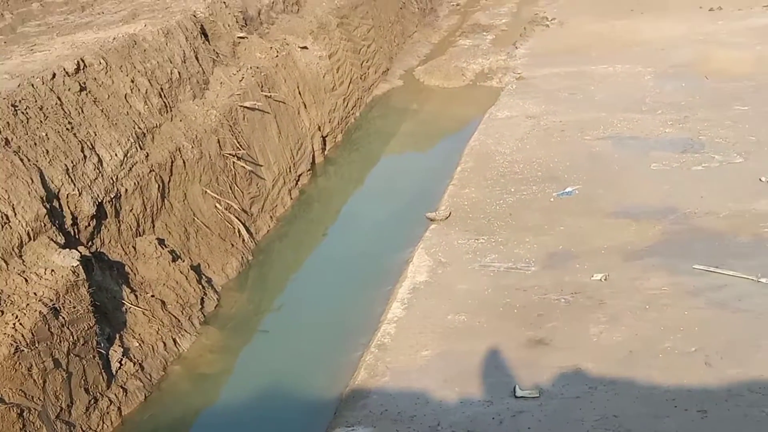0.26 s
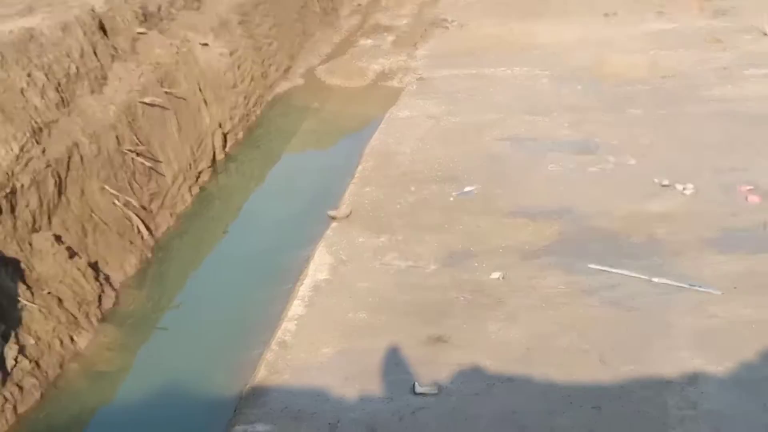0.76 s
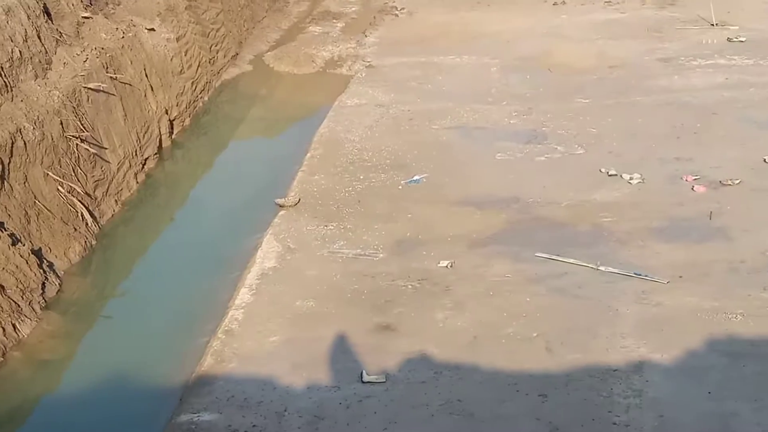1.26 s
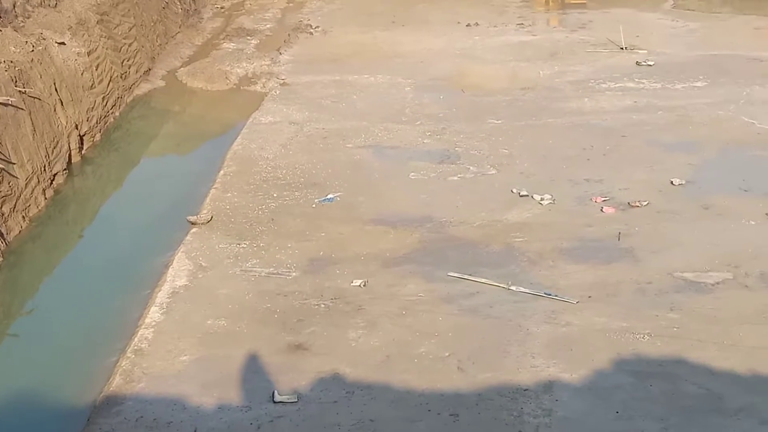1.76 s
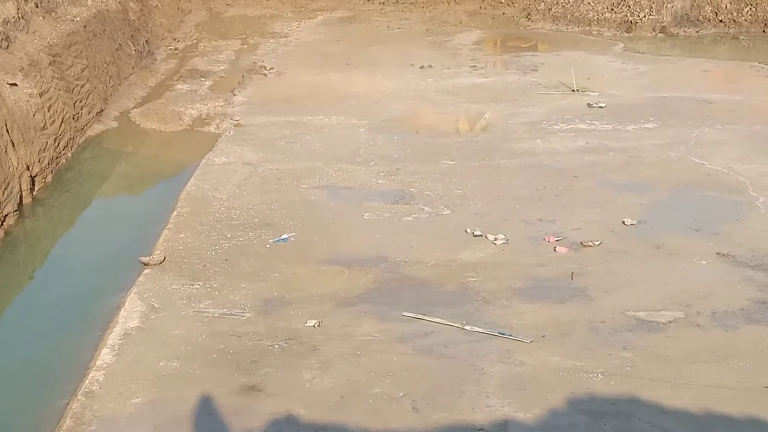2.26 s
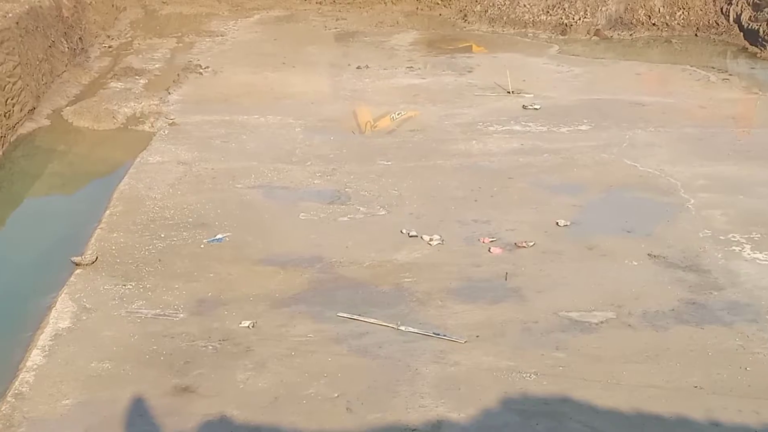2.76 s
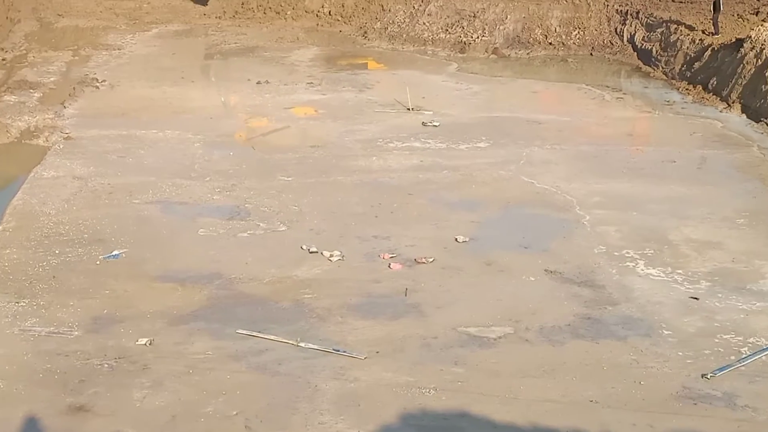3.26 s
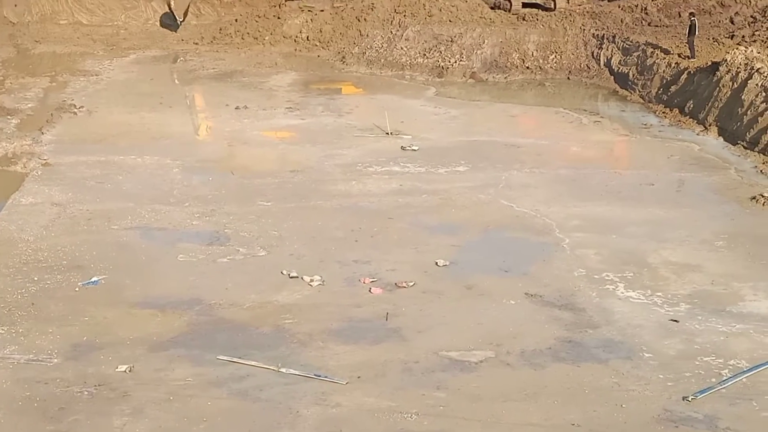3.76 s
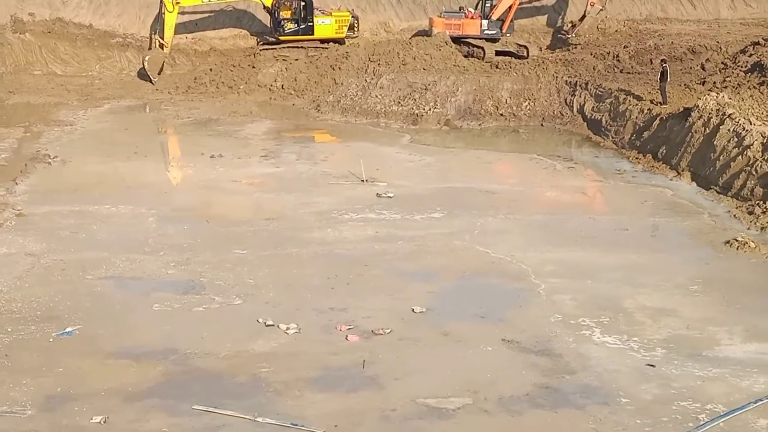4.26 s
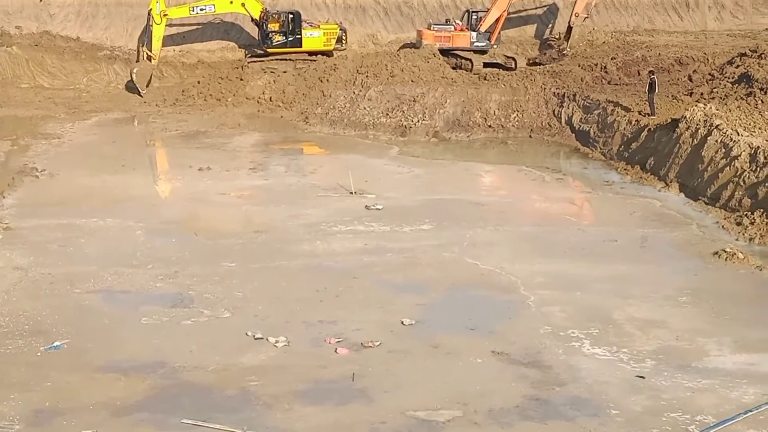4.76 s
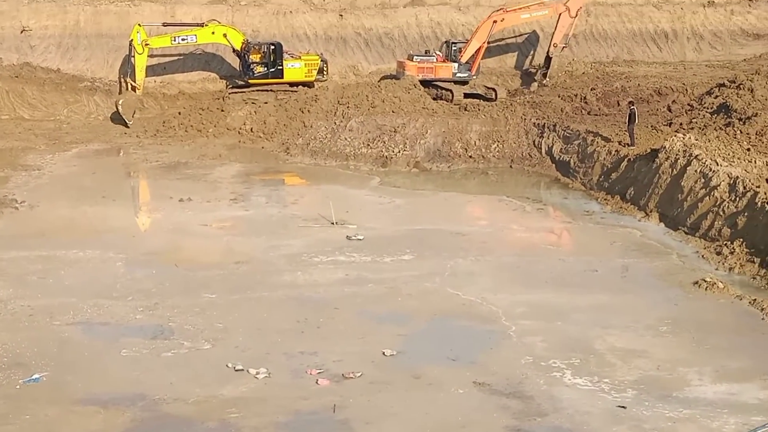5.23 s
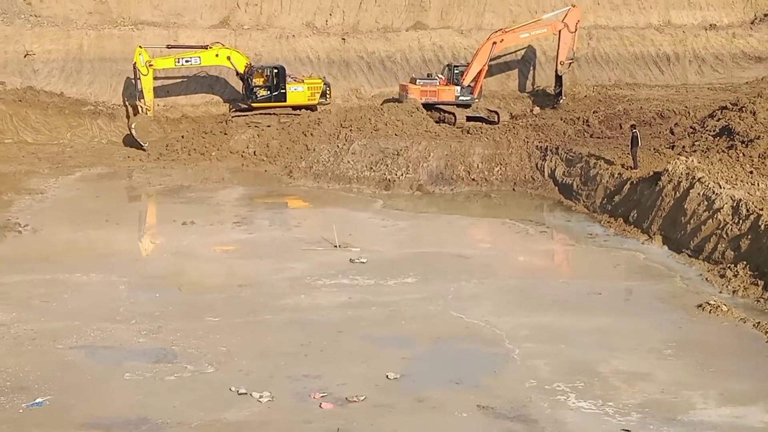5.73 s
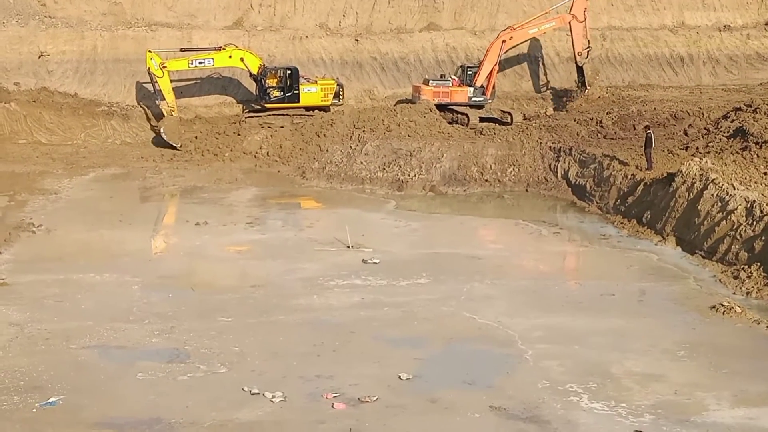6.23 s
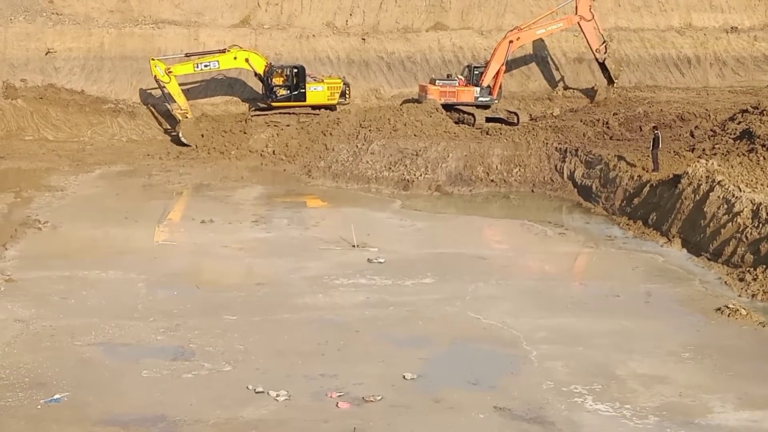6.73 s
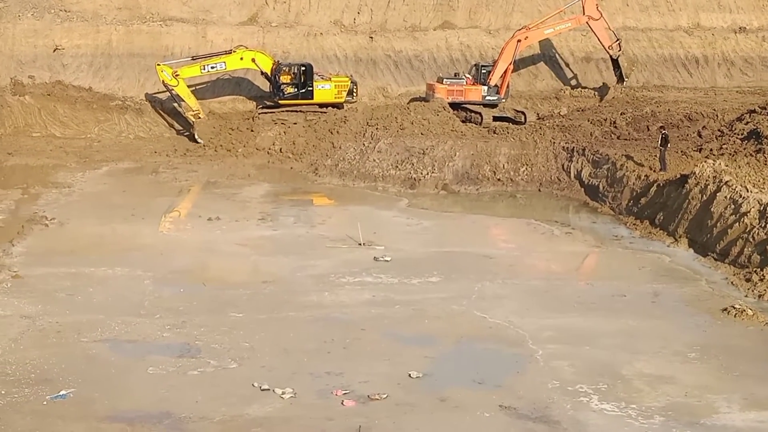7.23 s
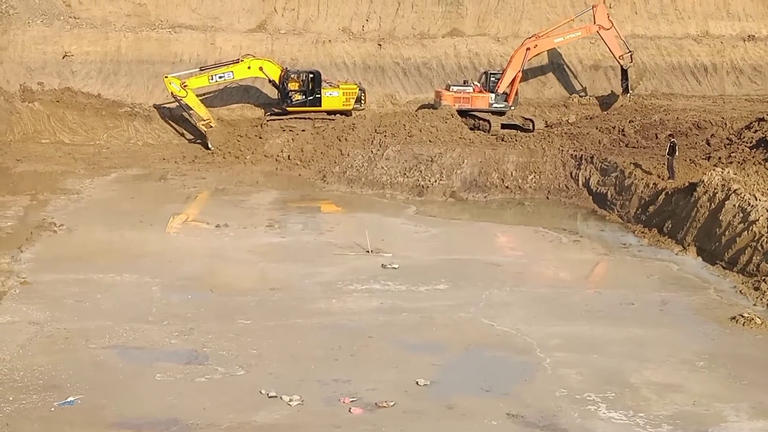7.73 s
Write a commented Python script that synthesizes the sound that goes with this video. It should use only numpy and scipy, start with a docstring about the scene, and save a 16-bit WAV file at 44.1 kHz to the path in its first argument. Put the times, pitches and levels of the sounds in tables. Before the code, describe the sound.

Heard from the rim of an open earth pit, two diesel excavators drone on the far side, their low firing tones beating over noisy clatter and faint thin whines. After two seconds, soil and stones start crunching, strongest between four and a half and just past six seconds, with pebble clicks and short bucket clanks. Light wind bumps the phone microphone.

```python
"""Two diesel excavators work on the far side of an open earth pit, heard from the rim as the phone pans to them.
One runs steadily while the other speeds up and sags: their firing tones beat over a noisy clatter and thin whines.
Soil and stones crunch in short showers of noise grains that the pit walls smear; brief tones are struck stones,
and harder blows ring a steel bucket as fading tones. A light breeze, made of low noise, puffs on the microphone."""
import sys
import numpy as np
from scipy import signal
from scipy.fft import rfft, irfft
from scipy.io import wavfile
from scipy.ndimage import uniform_filter1d

SR = 44100
rng = np.random.default_rng(int(sys.argv[2]) if len(sys.argv) > 2 else 0)


def dump_mix(stems):
    """Bounce the given channels to the path in sys.argv[1] as a 16-bit WAV at rate SR."""
    frames = np.atleast_2d(stems).T  # one column per channel
    limited = np.clip(frames, -1, 1)  # hard clip at full scale
    pcm = np.round(limited * 32767).astype(np.int16)
    wavfile.write(sys.argv[1], SR, pcm)


N = 352359
TIME = np.arange(N) / SR
FREQ = np.maximum(np.fft.rfftfreq(N, 1 / SR), 1)

# The steady excavator's engine: t/s, firing rate f/Hz, base exhaust level/dB
STEADY_ENGINE = [(0.0, 70.9, -53.5), (0.7, 71.16, -40.5), (1.35, 70.66, -50.5), (2.05, 71.9, -52.5),
                 (2.5, 70.02, -55), (4.0, 74.36, -50.5), (5.1, 73.88, -63.5), (5.6, 73.04, -56.5),
                 (7.99, 71.28, -52)]
# The engine that speeds up and sags with the load: t/s, firing rate f/Hz, base exhaust level/dB
WORKING_ENGINE = [(0.0, 67.3, -63), (0.35, 73.15, -58), (1.2, 72.36, -51), (1.9, 72.76, -48),
                  (2.25, 74.73, -54), (2.45, 76.24, -47.5), (2.95, 72.82, -50.5), (3.3, 78.67, -54),
                  (3.8, 74.44, -60), (4.3, 81.87, -57), (4.65, 72.28, -63), (4.88, 75.25, -53),
                  (5.0, 76.96, -56), (5.15, 76.12, -66), (5.28, 74.8, -58), (5.5, 73.18, -53),
                  (6.2, 72.33, -54.5), (7.99, 71.5, -51.5)]
# Exhaust overtones: multiple of the firing rate, base level/dB
OVERTONES = [(2, -62.5), (3, -67.5), (6, -64), (7, -66), (9, -66.5), (12, -68)]
# A pipe tone that shifts under load: t/s, f/Hz, base level/dB
PIPE_TONE = [(0, 250, -54), (.5, 214.3, -64), (1.4, 214.5, -48), (1.9, 213, -56.5), (2.3, 230, -62),
             (2.88, 242, -55), (3.2, 250, -72), (3.35, 257, -46), (3.55, 259, -54), (3.8, 250, -51.5),
             (4.1, 249, -52.5), (4.45, 253, -59), (4.75, 284, -43.5), (4.92, 248, -48), (5.08, 245.4, -42),
             (5.25, 252, -63.5), (5.8, 247, -66), (6.7, 250, -73), (7.99, 206.6, -48.5)]
# Machinery din: t/s, base level/dB, bass boost/dB, hiss boost/dB
DIN = [(0, -41.5, -3.5, 3.5), (.7, -42.5, -1, 3), (1.7, -42.5, -1.5, 4.5), (2.05, -43.5, -4, 1),
       (2.5, -44, 0, 2.5), (3, -42, -0.5, 7), (4, -41.5, 1.5, 5.5), (4.5, -39, -1, 5.5),
       (5.1, -38.5, 1, 6.5), (5.5, -37, -1, 3), (6.4, -41.5, 1, 6), (7.99, -41, 2, 5)]
# Colour of the din with the phone turned away: f/Hz, relative level/dB
DIN_AWAY = [(70, -6.5), (110, -2), (210, 11), (360, 0), (460, -0.5), (560, -8), (700, 3.5), (850, 1.5),
            (1020, -6), (1280, 2), (1750, -7.5), (2400, 2), (3600, -11), (4800, -19.5), (6100, -17.5),
            (7000, -43.5), (8400, -71.5)]
# Colour of the din with the phone facing the machines: f/Hz, relative level/dB
DIN_FACING = [(70, -23), (110, -3.5), (155, 0), (195, -6.5), (260, 0), (370, -4), (460, -2), (560, -5.5),
              (700, 2.5), (850, 3), (1020, -6), (1300, -2.5), (1750, -6.5), (2200, 5), (2700, -8.5),
              (3300, -22), (4800, -32.5), (6100, -35), (7000, -37.5), (8400, -70)]
# Engine panels that buzz in the din, each swelling on its own: f/Hz, width/Hz, swell/dB
PANELS = [(633, 51, 3), (730, 83, 2.5), (815, 90, 4.5), (1360, 120, 2), (2110, 270, 2.5), (2350, 170, 4)]
# How far the phone faces the machines: t/s, share/0-1
FACING = [(0, 0.35), (1.6, 0.42), (2.4, 0.47), (3.2, 0.86), (7.99, 0.75)]
# Likeness of the two microphone ports: f/Hz, coherence/0-1
LIKENESS = [(60, 0.98), (250, 0.99), (500, 0.91), (1000, 0.85), (2000, 0.29), (4000, 0.015), (8000, 0)]
# Colour of the ports: f/Hz, left minus right turned away/dB, left minus right facing/dB
PORTS = [(60, -1, -1.5), (300, -0.5, 1), (570, -3.5, -5), (895, -3, 1), (1330, -5, -4), (1960, -8.5, 6.5),
         (2850, 5.5, 12.5), (3000, 9, 0), (5100, -13, -4.5), (6150, -13.5, 3), (8000, 0.5, 0.5)]
# Gusts on the microphone ports: t of the peak/s, base level/dB, swell and fade time/s
GUSTS = [(.68, -43.5, 0.13), (1.9, -57, 0.28), (5.15, -53, .2), (6.08, -32.5, 0.031), (6.3, -40.5, 0.098)]
# Single puffs of wind: t/s, starting level in the right port/dB, f/Hz
PUFFS = [(0.647, -26, 164), (0.77, -34, 118), (6.021, -26.5, 134), (6.074, -36, 125), (6.312, -26.5, 140)]
# Short whines of the machinery: t/s, length/s, starting f/Hz, base level/dB
WHINES = [(0.038, 0.28, 2355, -50.5), (.5, 0.38, 2115, -52), (0.18, .42, 2100, -58), (0.6, 0.69, 2755, -55),
          (.78, 0.36, 2200, -53), (1.07, .2, 2580, -56), (1.7, 0.52, 2100, -50.5), (1.33, .45, 3008, -58.5)]
# Slips of soil and stones: t/s, base crunch level/dB, then thud, knock and grit over it/dB,
# attack/s, hold/s
CRUNCHES = [(2.105, -37.5, 0.5, 1, -12.5, .004, 0.041), (2.18, -38.5, -6.5, -2.5, -17, 0.0058, 0.043),
            (2.239, -38.5, -11, -5.5, -13.5, 0.0054, 0.019), (2.544, -31, -8, -6, -11.5, 0.005, .014),
            (2.835, -48, 6.5, -8, -8, 0.0051, 0.028), (3.621, -42.5, -0.5, 3, -13.5, .004, .035),
            (4.049, -31, -7.5, -14, -15.5, 0.0067, 0.014), (4.083, -29.5, -12.5, -0.5, -5.5, 0.0044, 0.026),
            (4.579, -25, -5, -3, -9, .004, 0.061), (4.764, -32.5, -11, -7.5, -19, 0.014, 0.053),
            (4.828, -24.5, -13.5, -10, -12, 0.006, 0.034), (4.869, -27, -9.5, -7, -14.5, .006, 0.038),
            (5.076, -32, -16, -16, -17, 0.014, .0082), (5.239, -26.5, -6, -9.5, -13, 0.012, 0.083),
            (5.423, -34, -8, -13, -16.5, 0.0089, 0.0086), (5.525, -37.5, -7, -13, -14, 0.0044, .015),
            (5.544, -36.5, 0, -0.5, -15, 0.01, 0.023), (5.83, -26, -5, -12.5, -11.5, 0.005, 0.012),
            (5.86, -26, -10.5, -6, -14, 0.006, 0.08), (5.953, -29, -19, -8, -11, 0.014, 0.046),
            (6.129, -22, -5, -5, -11.5, 0.019, 0.057), (7.009, -39, -13, 4, -17, 0.014, 0.014),
            (7.158, -41, -8, 2, -19, 0.0036, 0.023), (7.33, -34, -4, -4, -11.5, 0.0068, 0.043),
            (7.361, -36.5, 4, 2, -13.5, 0.0085, 0.056), (7.59, -47, -16, 5.5, -18, 0.0089, 0.093),
            (7.728, -37, -2.5, -6, -14, 0.0069, 0.022), (7.762, -32, -5, -5.5, -10, 0.006, 0.028)]
# Broad colour of the soil: f/Hz, relative level/dB
CRUNCH_COLOUR = [(80, -19.5), (140, -7), (270, 7.5), (390, -8.5), (490, 5.5), (570, -3), (735, 4),
                 (1050, 0.5), (1350, 5.5), (1750, 3.5), (2220, 9), (3200, -4), (4500, -17), (6200, -26),
                 (8400, -47.5), (11000, -65.5), (14900, -74)]
# Short resonances that every crunch rings: f/Hz, width/Hz, boost/dB
RINGS = [(750, 310, 4.5), (1357, 160, 1.5), (2150, 200, 1.5), (2580, 250, 2), (3500, 140, 4.5),
         (5800, 240, -0.5)]
# Dry clicks of lone pebbles: t/s, body base level/dB, bright edge base level/dB
CLICKS = [(2.117, -38, -39), (2.15, -37, -42), (2.26, -36.5, -45), (2.56, -31, -32.5), (2.847, -38, -50),
          (3.46, -36, -51), (3.628, -42, -47), (4.128, -30.5, -42), (4.895, -29.5, -49), (5.027, -36, -46),
          (5.095, -40.5, -54), (5.19, -32, -50), (5.441, -39, -50), (5.524, -35, -49), (5.593, -35, -51),
          (5.935, -35, -50), (5.972, -32, -44), (7.185, -40, -58), (7.334, -28, -43.5), (7.421, -49, -47),
          (7.594, -35, -50), (7.839, -31.5, -46)]
# Hard strikes of steel on stone: t/s, base level/dB, f/Hz, second, quieter partial f/Hz, ring time/s
STRIKES = [(2.165, -38, 2215, 2140, .035), (2.204, -34, 2240, 2193, 0.032), (2.257, -38, 2180, 2160, 0.015),
           (2.553, -32, 715, 787, 0.067), (4.062, -28, 2040, 2360, 0.011),
           (4.091, -17.5, 2090, 2624, 0.0047), (4.588, -19, 2164, 2593, 0.007),
           (4.596, -21, 1925, 2310, 0.0073), (4.834, -27, 1770, 3630, 0.0069),
           (4.834, -35, 6200, 6350, 0.004), (4.847, -29, 1300, 2020, .006), (4.914, -26, 2260, 2640, .009),
           (5.318, -33, 739, 2270, .012), (5.523, -24, 2070, 865, 0.0072), (5.84, -25, 1766, 2170, 0.0049),
           (5.84, -31.5, 4500, 3500, 0.0081), (5.841, -34.5, 3290, 3260, 0.055),
           (6.146, -29, 2160, 2700, 0.0092), (6.17, -38, 3900, 4700, 0.01),
           (7.334, -28, 2290, 1390, 0.0038), (7.355, -27, 1390, 2265, 0.021),
           (7.378, -54.5, 5730, 5800, 0.066), (7.392, -33.5, 795, 713, 0.045),
           (7.772, -31.5, 2110, 2270, 0.032)]
# Blows that ring a steel bucket: t/s, base level/dB, tilt/dB per octave, ring length/multiple of the modes' own
CLANGS = [(2.552, -35, 1.5, .75), (4.085, -34, -4.5, 1), (4.592, -35.5, 1, 1), (4.624, -35.5, -5, 1),
          (4.882, -40.5, 0, .8), (5.253, -38.5, -2, .8), (5.871, -40, -5, 1), (6.187, -29, -7.5, .8),
          (7.378, -34.5, -3, 1), (7.408, -40, -6.5, 1.3), (7.625, -40.5, -6, 1), (7.775, -34.5, -3, .8)]
# Modes of the bucket: f/Hz, relative level/dB, ring time/s
BUCKET_MODES = [(694, -2, 0.051), (726, -7.5, 0.049), (797, -6, 0.085), (932, -10, 0.06), (1350, -15, 0.04),
                (2150, -13.5, 0.04), (2950, -5, 0.05), (2930, -3.5, 0.018), (3200, -10, 0.017),
                (3470, -6, 0.02), (3760, -9.5, 0.036), (5000, -18, 0.015)]

# overtones follow this share of the exhaust's swing about its usual level
OVERTONE_FOLLOW, USUAL_DB = 0.41, -52.5
STEADY_OVERTONES_DB, WORKING_OVERTONES_DB = -0.5, -6  # strength of each engine's overtones
CALM_DB = -68.5  # base level of the breeze between gusts
WHINE_RISE_HZ_PER_S = 70
SAG_DB_PER_S = 27  # a slip weakens while it runs
RELEASE_S = .054  # then dies away this fast
WALLS_DB, WALLS_S = -10, 0.097  # its echo off the pit walls: level and fade time
RING_SWELL_DB, RING_SWELLS_PER_S = 3.5, 30  # crunch rings come and go as the contact point moves
TOP_HZ = 14900  # the final low-pass cuts what lies above


def undb(db):
    """Turn decibels into gain."""
    return 10 ** (np.asarray(db) / 20)


def unit(x):
    """Scale to rms 1."""
    return x / np.sqrt(np.mean(x ** 2))


def curves(rows):
    """Read the columns of a time table at every sample."""
    s, *columns = np.transpose(rows)
    return [np.interp(TIME, s, column) for column in columns]


def over_freq(points):
    """Read an (f/Hz, value) table at every frequency, on a log pitch scale."""
    hz, value = np.transpose(points)
    return np.interp(np.log(FREQ), np.log(hz), value)


def shape(x, gain):
    """Filter by a gain at every frequency."""
    return irfft(rfft(x) * gain, N)


def below(hz, order=8):
    """Gain that keeps the sound below a frequency."""
    return 1 / (1 + (FREQ / hz) ** order)


def walk(rate):
    """Random levels held for 1 / rate seconds and smoothed twice; their spread is near 1."""
    hold = int(SR / max(rate, .5))
    steps = np.repeat(rng.standard_normal(N // hold + 1), hold)[:N]
    return 1.23 * uniform_filter1d(uniform_filter1d(steps, hold), hold)


def spread(pair):
    """Two unrelated signals become left and right: alike in the bass, diffuse in the treble."""
    alike = np.clip(over_freq(LIKENESS), 0, .99)
    mid, side = shape(pair, np.sqrt([1 + alike, 1 - alike]))
    return np.array([mid + side, mid - side])


def swelling(x, bands, rate):
    """Each resonance (f/Hz, width/Hz, swell/dB) swells and fades on its own."""
    spectrum = rfft(x)
    for hz, width, swell_db in bands:
        gain = unit(undb(swell_db * walk(rate)))
        band = irfft(spectrum * np.exp(-(2 * (FREQ - hz) / width) ** 2), N)
        x = x + band * (gain - 1)
    return x


def engine(rows):
    """Add up an engine's firings so far; also return its base exhaust level in dB."""
    hz, db = curves(rows)
    return np.cumsum(hz) / SR, db


def exhaust(engines, waver=0.07):
    """Each engine sounds a firing tone and wavering overtones, so the two beat; a pipe tone shifts above."""
    drift = np.array([walk(12), walk(2.2)])  # echoes off the walls reach each port differently
    out = 0
    for (firings, level_db), overtone_db in zip(engines, (STEADY_OVERTONES_DB, WORKING_OVERTONES_DB)):
        firing_gain = undb(level_db + 0.1 + 1.0 * walk(15.0))
        out += firing_gain * np.sin(2 * np.pi * firings + waver * drift)
        effort_db = overtone_db + OVERTONE_FOLLOW * (level_db - USUAL_DB)
        for multiple, db in OVERTONES:
            gain = undb(db + effort_db + 3.55 * walk(5.2))
            out += gain * np.sin(2 * np.pi * multiple * firings + 1.0 * walk(11))
    pipe_hz, pipe_db = curves(PIPE_TONE)
    pipe_phase = 2 * np.pi * np.cumsum(pipe_hz) / SR + .5 * walk(14)
    out += undb(pipe_db + 1.8 * walk(13)) * np.sin(pipe_phase)
    return np.sqrt(2) * out


def clatter(firings, repeat, throb, firings_per_cycle=4):
    """Valves and injectors repeat every four firings; combustion noise swells with each firing."""
    size = int(firings_per_cycle * N / firings[-1])
    cycle = rng.standard_normal((2, size))
    place = (firings / firings_per_cycle % 1 * size).astype(int)
    gas = rng.standard_normal((2, N)) * (1 + throb * np.cos(2 * np.pi * firings))
    return unit(gas) + repeat * cycle[:, place]


def machinery(steady, working, bounce=0.074, bounce_s=0.0055, bounce_drift=0.00038):
    """Both engines' clatter crosses the pit; its colour turns with the phone."""
    level_db, bass_db, hiss_db = curves(DIN)
    facing = np.clip(curves(FACING)[0], 0, 1)
    both = clatter(steady, repeat=0.42, throb=0.074) + clatter(working, repeat=0.9, throb=0.053)
    both = spread(both)
    # the bounce off the ground combs the din, and the comb slides as the phone moves
    late = TIME - bounce_s + bounce_drift * TIME
    both = both + bounce * np.array([np.interp(late, TIME, port) for port in both])
    away, ahead = (unit(shape(both, undb(over_freq(colour)))) for colour in (DIN_AWAY, DIN_FACING))
    din = swelling((1 - facing) * away + facing * ahead, PANELS, 14)
    bass, hiss = shape(din, below(380)), shape(din, 1 - below(3550))
    middle = (din - bass - hiss) * undb(0.56 * walk(20))
    din = middle + bass * undb(bass_db + 1.2 * walk(18)) + hiss * undb(hiss_db)
    rumble = unit(shape(both, below(100) * (1 - below(80, order=6))))
    return din * undb(level_db + 0.46) + undb(-63.0) * rumble


def wind(decay_s=0.0089, left_db=-11):
    """The breeze flutters in each port on its own, mostly the right one; puffs bump it."""
    breeze = undb(CALM_DB) + sum(undb(db) * np.exp(-np.abs(TIME - s) / fade) for s, db, fade in GUSTS)
    low_band = below(220, order=3) * (1 - below(72, order=6))
    eddies = unit(shape(rng.standard_normal((2, N)), low_band))
    out = eddies * breeze * undb(3.8 * walk(30))
    t = TIME[:SR // 10]
    for s, db, hz in PUFFS:
        start = int(s * SR)
        out[:, start:start + len(t)] -= undb(db) * np.sin(2 * np.pi * hz * t) * np.exp(-t / decay_s)
    return out * undb([[left_db], [0]])


def whine(flutter=0.45):
    """Thin high tones swell, glide upwards and fade, broken up on their way across the pit."""
    out = np.zeros((2, N))
    flicker = undb(4.9 * np.array([walk(14), walk(11)]))
    wander = flutter * np.array([walk(35), walk(39)])
    for s, length, hz, db in WHINES:
        t = TIME[:int(length * SR)]
        start = max(int(s * SR), 0)
        span = slice(start, start + len(t))
        phase = 2 * np.pi * (hz + WHINE_RISE_HZ_PER_S * t / 2) * t
        swell = np.sin(np.pi * t / length)
        out[:, span] += undb(db) * swell * flicker[:, span] * np.sin(phase + wander[:, span])
    return out


def crunch_colour():
    """Broad colour of the soil with its narrow resonances on top, as a gain."""
    peaks_db = sum(db / (1 + (2 * (FREQ - hz) / width) ** 2) for hz, width, db in RINGS)
    return undb(over_freq(CRUNCH_COLOUR) + peaks_db)


def lumps(per_s=70, lump_db=-4, lump_s=0.019, rise_s=.0015):
    """Clods land at random within a shower: each is a quick surge that dies at once; mean power 1."""
    landings = (rng.random(N) < per_s / SR) * rng.uniform(0.33, 1, N)
    poles = np.exp(-1 / (np.array([lump_s, rise_s]) * SR))
    surge = signal.lfilter([1], np.poly(poles), landings)
    return unit(np.sqrt(1 + undb(lump_db) ** 2 * surge / np.mean(surge)))


def crunches(scatter_db=1.5, density=.35, shower_db=-3.5):
    """Slips are showers of grains: grit cracks first, the heavy thud builds later, the walls add a tail."""
    sizes = undb(scatter_db * np.minimum(rng.exponential(size=N), 3.5)) * (rng.random(N) < density)
    grains = spread(sizes * rng.standard_normal((2, N)))
    colour = crunch_colour()
    thud, knock, crunch = below(460), below(1155), below(3990)
    # from thud up to grit: (gain, slowness of the rise)
    bands = [(thud, 3), (knock - thud, 1.5), (crunch - knock, 1), (1 - crunch, .8)]
    power = np.zeros((len(bands), N))
    for s, db, thud_db, knock_db, grit_db, attack, hold in CRUNCHES:
        start = int(s * SR)
        t = TIME[:min(SR // 2, N - start)]
        after = np.maximum(t - hold, 0)
        fall = np.exp(-2 * after / RELEASE_S) + undb(WALLS_DB) ** 2 * np.exp(-2 * after / WALLS_S)
        fall = fall * undb(-SAG_DB_PER_S * np.minimum(t, hold)) ** 2
        for k, band_db in enumerate(db + np.array([thud_db, knock_db, 0, grit_db])):
            swell = 1 - np.exp(-t / (attack * bands[k][1]))
            power[k, start:start + len(t)] += undb(band_db) ** 2 * fall * swell ** 2
    shower = sum(unit(shape(grains, colour * gain)) * np.sqrt(p) for (gain, _), p in zip(bands, power))
    ring_bands = [(hz, width, RING_SWELL_DB) for hz, width, _ in RINGS]
    shower = swelling(shower, ring_bands, RING_SWELLS_PER_S)
    return shower * undb(shower_db) * lumps()


def stones(ring_db=-12, ring_s=0.031, count=8):
    """In each crunch a few stones are struck and ring briefly, each at its own pitch."""
    out = np.zeros((2, N + SR))
    t = TIME[:SR // 6]
    for s, slip_db, _, knock_db, grit_db, attack, hold in CRUNCHES:
        levels = slip_db + np.array([knock_db, 0, grit_db])
        for pitch, when, side in rng.random((count, 3)):
            hz = 650 * 8.5 ** pitch
            db = np.interp(hz, [800, 2300, 3500], levels)
            start = int((s + attack + when * (hold + RELEASE_S / 2)) * SR)
            ring = undb(db + ring_db) * np.sin(2 * np.pi * hz * t) * np.exp(-t / ring_s)
            pan = np.sqrt([2 * side, 2 - 2 * side])
            out[:, start:start + len(t)] += np.outer(pan, ring)
    return shape(out[:, :N], below(6500, order=12))


def clicks(decay_s=0.0051, tail_db=-12, tail_s=0.052, bright_hz=2900, rise_s=0.00089):
    """A lone pebble knocks the heap: a dry crack with little above 6.5 kHz, and a short fading tail."""
    body, edge = np.zeros((2, N))
    t = TIME[:SR // 8]
    fall = np.exp(-t / decay_s) + undb(tail_db) * np.exp(-t / tail_s)
    fall = fall * (1 - np.exp(-t / rise_s))
    for s, body_db, edge_db in CLICKS:
        span = slice(int(s * SR), int(s * SR) + len(t))
        body[span] += undb(body_db) * fall
        edge[span] += undb(edge_db) * fall
    noise = shape(spread(rng.standard_normal((2, N))), crunch_colour() * (1 - below(600)))
    low = unit(shape(noise, below(bright_hz)))
    high = unit(shape(noise, (1 - below(bright_hz)) ** 4))
    return shape(body * low + edge * high, below(6500, order=12))


def strikes(second_db=-3, crack_db=-7, crack_s=0.0048):
    """A hard contact cracks and rings two partials, which reach each port with their own phase."""
    out = np.zeros((2, N))
    t = TIME[:SR // 6]
    onset = 1 - np.exp(-t / 0.0014)
    crack = unit(shape(spread(rng.standard_normal((2, N))), crunch_colour()))
    for s, db, hz, second_hz, ring_s in STRIKES:
        span = slice(int(s * SR), int(s * SR) + len(t))
        turn = 1.14 * rng.standard_normal((2, 2, 1))  # radians, by partial and port
        ring = np.sin(2 * np.pi * hz * t + turn[0])
        ring = ring + undb(second_db) * np.sin(2 * np.pi * second_hz * t + turn[1])
        snap = undb(crack_db) * crack[:, span] * np.exp(-t / crack_s)
        out[:, span] += undb(db) * onset * (ring * np.exp(-t / ring_s) + snap)
    return out


def bucket(scatter_db=3.0, split_hz=6, twin_db=-8, port_turn=0.36, contact_s=0.0025):
    """Blows ring the same steel modes as close pairs; the landing spot changes their balance, soil damps them."""
    out = np.zeros((2, N + SR))
    t = TIME[:SR // 2]
    onset = 1 - np.exp(-t / contact_s)
    for s, blow_db, tilt_db, length in CLANGS:
        start = int(s * SR)
        for hz, db, ring_s in BUCKET_MODES:
            size, split, phase, left, right = rng.standard_normal(5)
            angle = 2 * np.pi * (hz * t + phase) + port_turn * np.array([[left], [right]])
            twin = np.sin(angle + 2 * np.pi * split_hz * split * t + np.pi / 2)
            pair = np.sin(angle) + undb(twin_db) * twin
            octaves = np.log2(hz / BUCKET_MODES[0][0])
            gain = undb(blow_db + db + tilt_db * octaves + scatter_db * size)
            out[:, start:start + len(t)] += gain * pair * np.exp(-t / (ring_s * length)) * onset
    return out[:, :N]


def scene():
    """Engines, digging and the breeze together."""
    steady, working = engine(STEADY_ENGINE), engine(WORKING_ENGINE)
    engines = exhaust([steady, working]) + machinery(steady[0], working[0])
    breeze = wind()
    whines = whine()
    digging = crunches() + stones() + clicks() + strikes() + bucket()
    return engines + breeze + whines + digging


def record(dry, fade_s=0.00083):
    """The ports' colours change as the phone turns; both ends fade and the top is cut."""
    facing = np.clip(curves(FACING)[0], 0, 1)
    sides = np.array([[.5], [-.5]])  # left and right share each difference
    hz, *balances = np.transpose(PORTS)
    dry = dry * np.minimum(np.minimum(TIME, TIME[::-1]) / fade_s, 1)
    away, ahead = (shape(dry, undb(sides * over_freq(np.c_[hz, db]))) for db in balances)
    turned = (1 - facing) * away + facing * ahead
    top_cut = signal.ellip(8, .2, 70, TOP_HZ, fs=SR, output="sos")
    return signal.sosfilt(top_cut, turned)


dry = scene()
out = record(dry)
dump_mix(out)
```